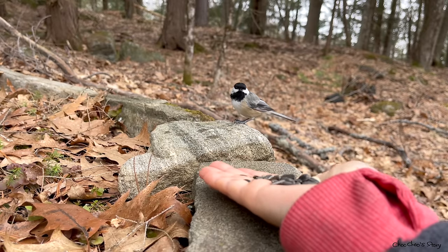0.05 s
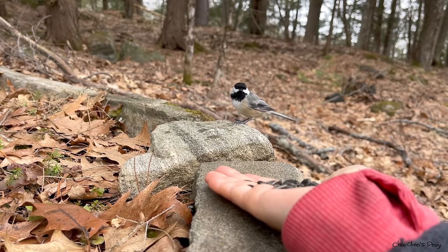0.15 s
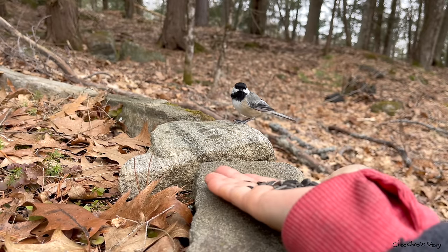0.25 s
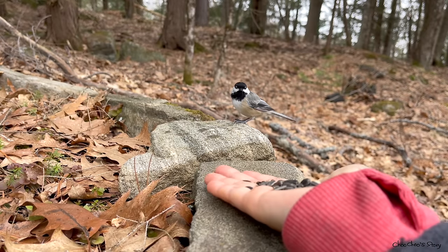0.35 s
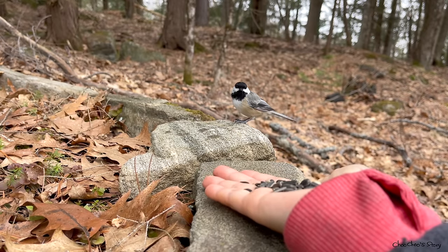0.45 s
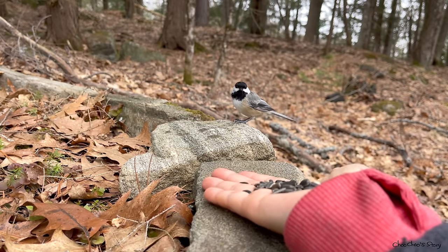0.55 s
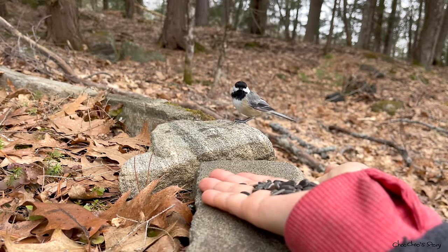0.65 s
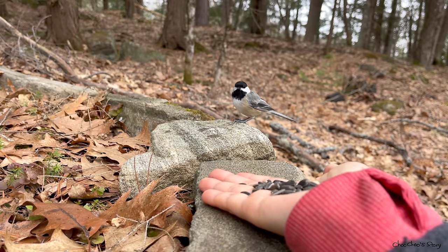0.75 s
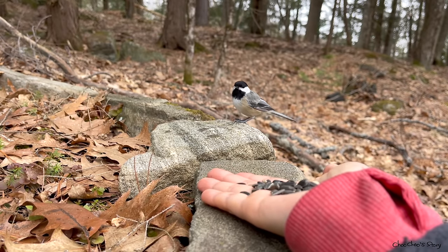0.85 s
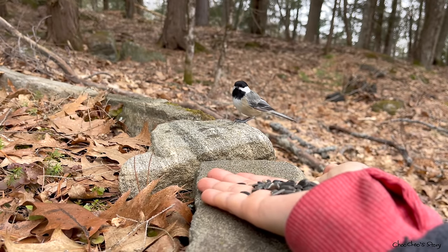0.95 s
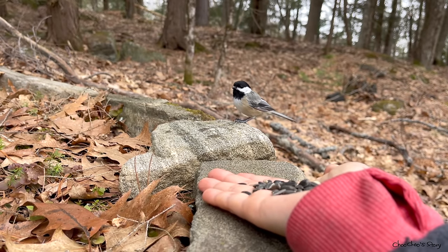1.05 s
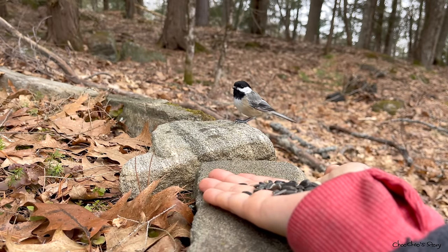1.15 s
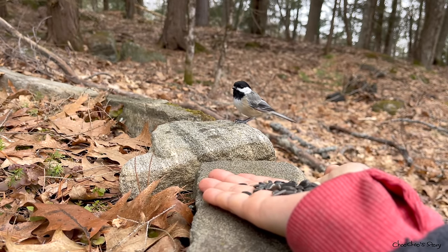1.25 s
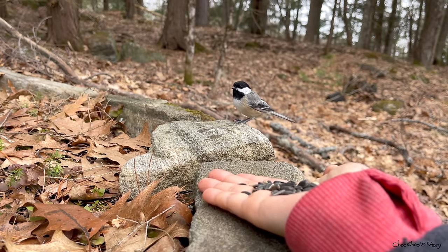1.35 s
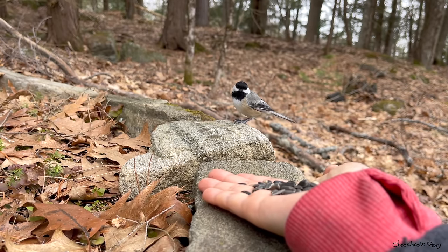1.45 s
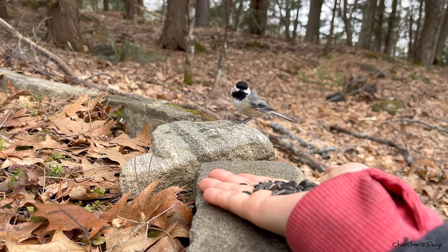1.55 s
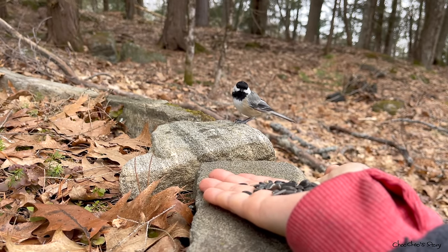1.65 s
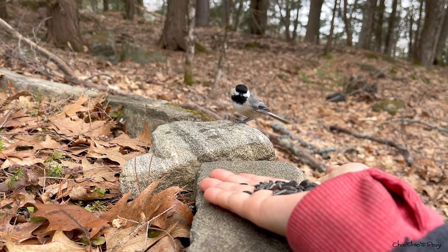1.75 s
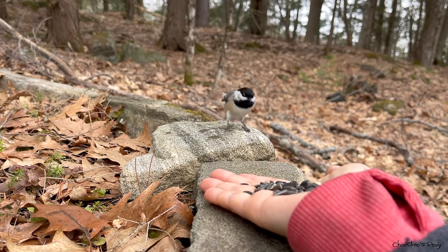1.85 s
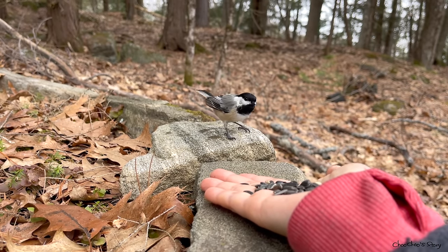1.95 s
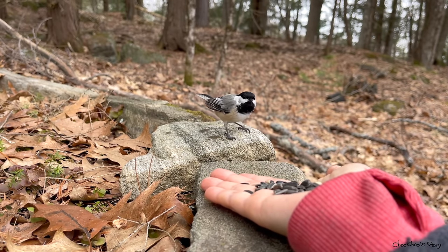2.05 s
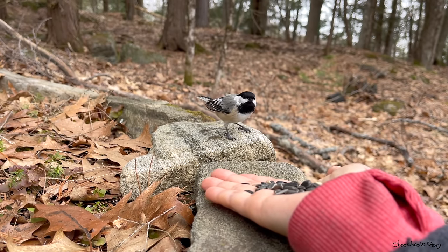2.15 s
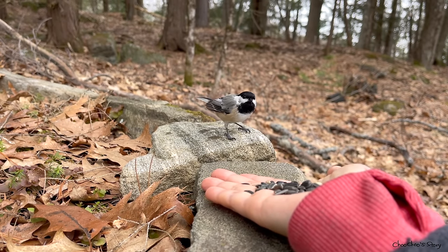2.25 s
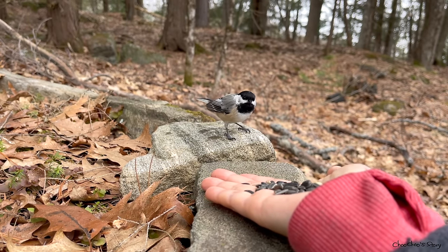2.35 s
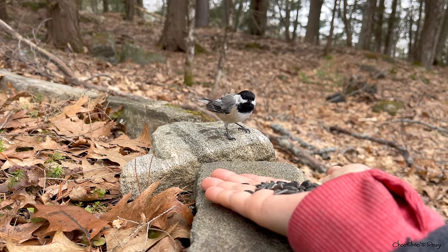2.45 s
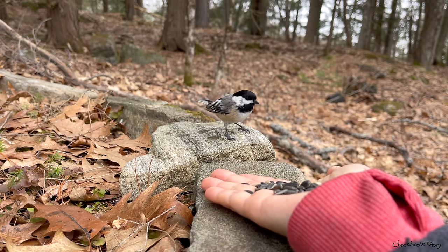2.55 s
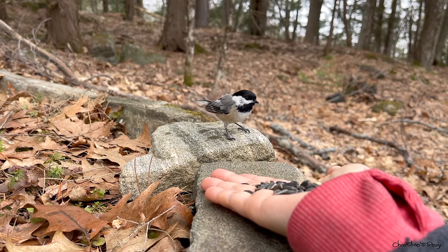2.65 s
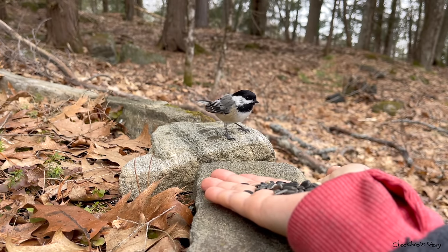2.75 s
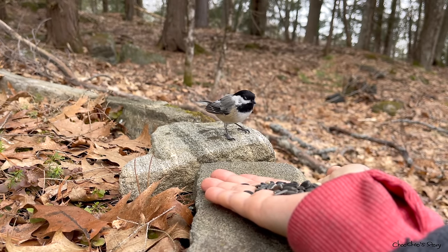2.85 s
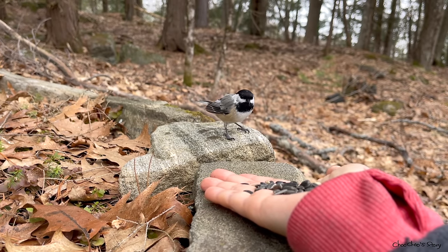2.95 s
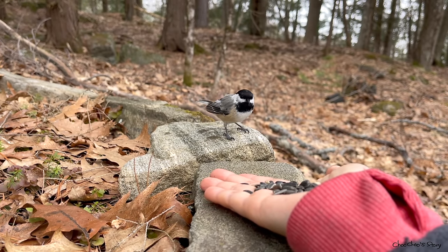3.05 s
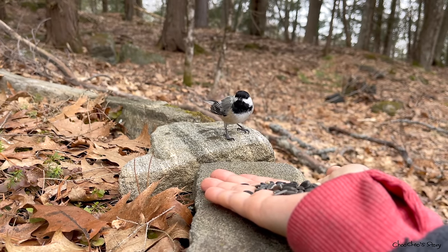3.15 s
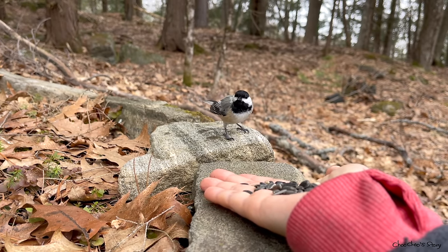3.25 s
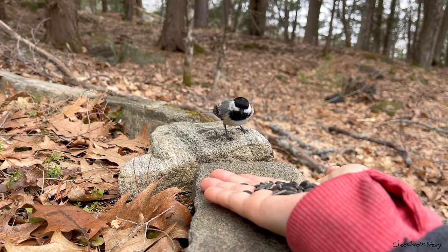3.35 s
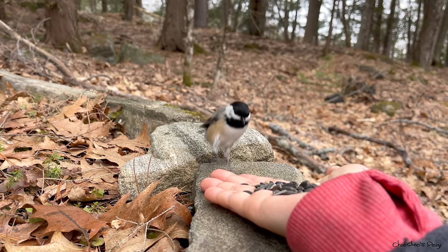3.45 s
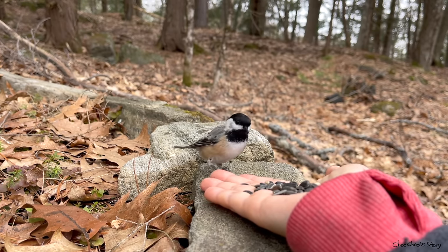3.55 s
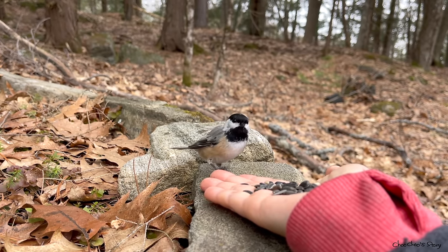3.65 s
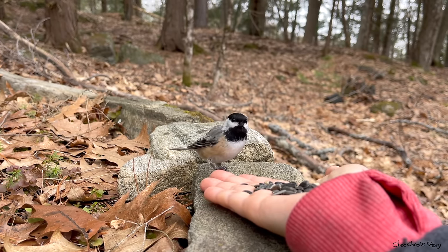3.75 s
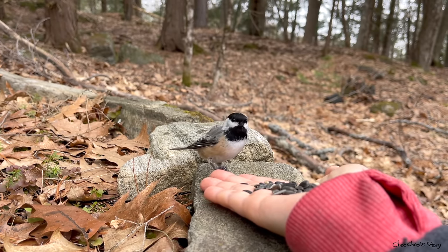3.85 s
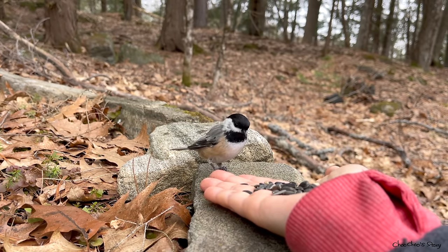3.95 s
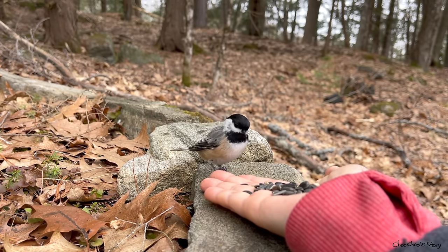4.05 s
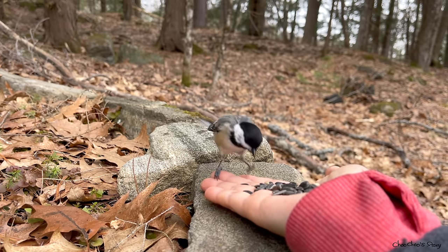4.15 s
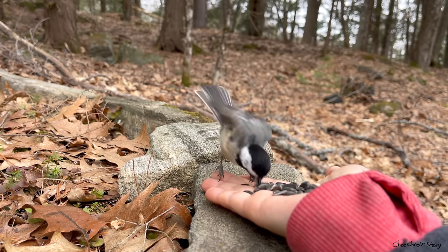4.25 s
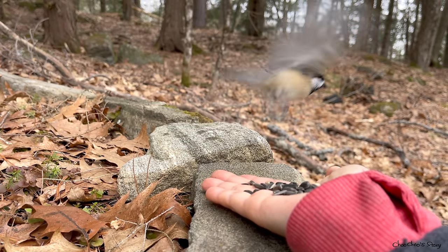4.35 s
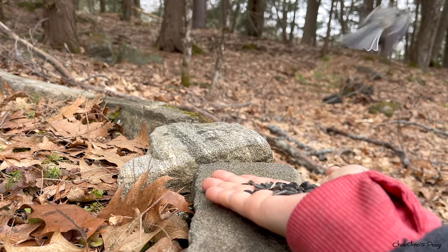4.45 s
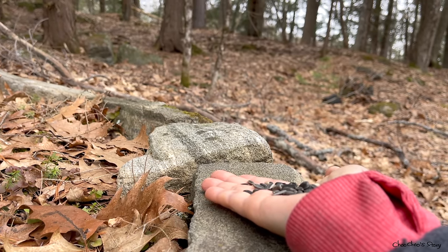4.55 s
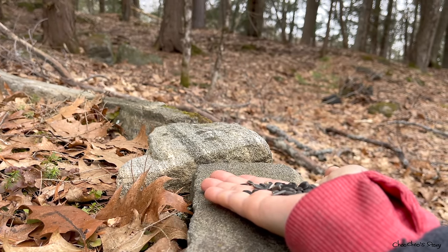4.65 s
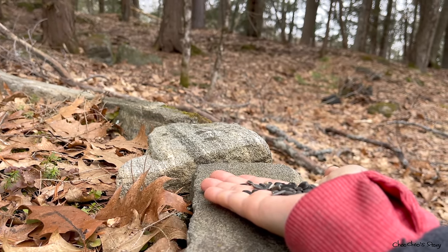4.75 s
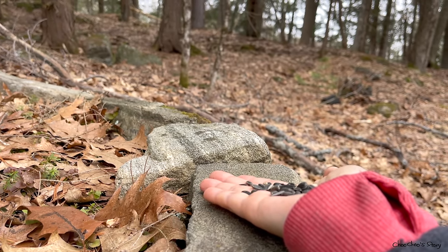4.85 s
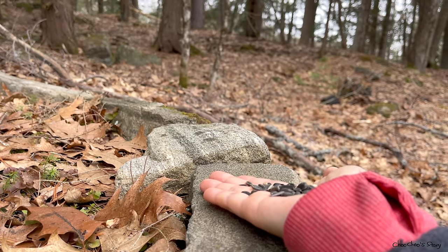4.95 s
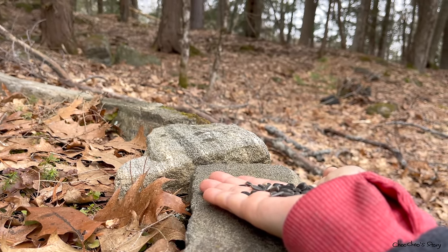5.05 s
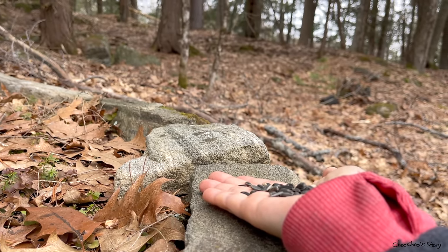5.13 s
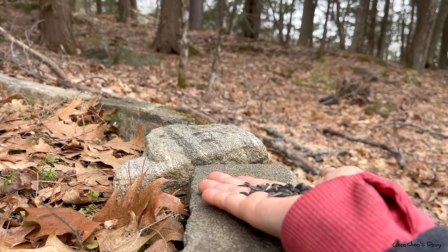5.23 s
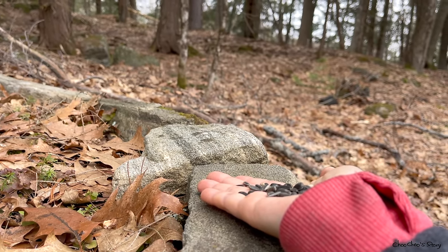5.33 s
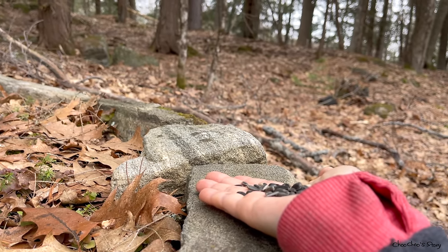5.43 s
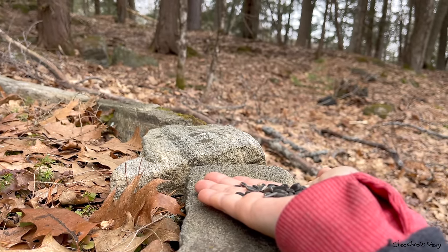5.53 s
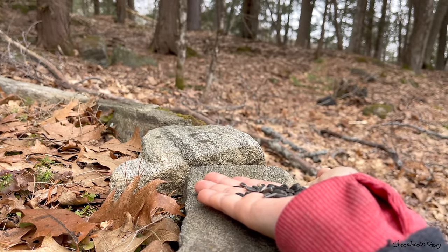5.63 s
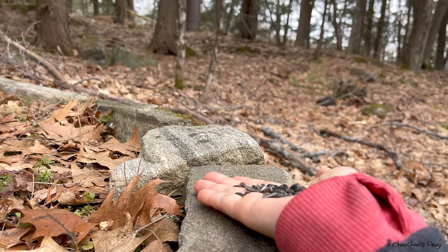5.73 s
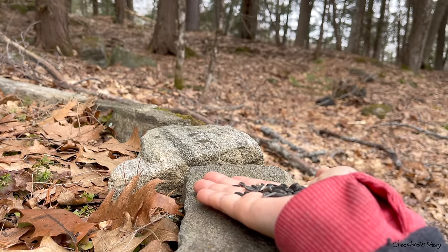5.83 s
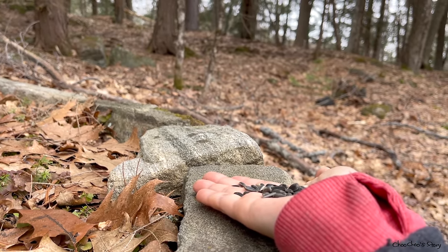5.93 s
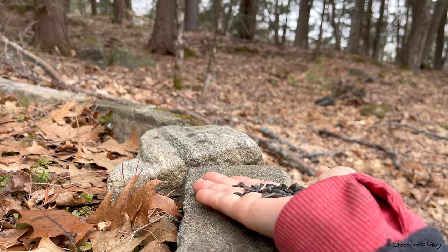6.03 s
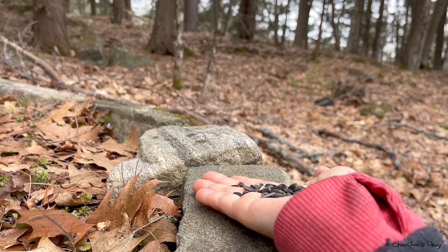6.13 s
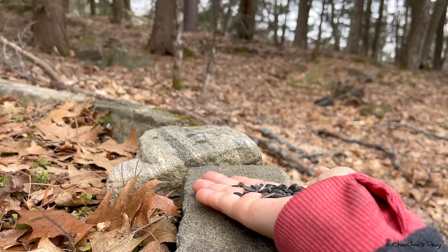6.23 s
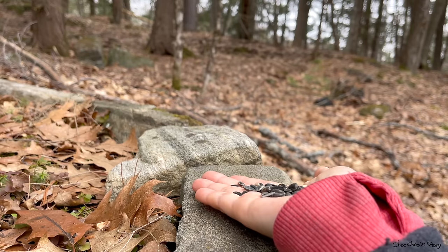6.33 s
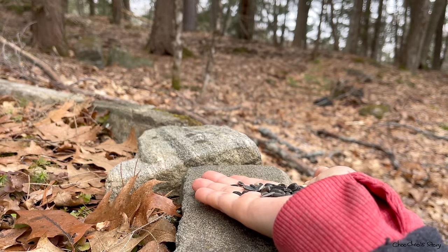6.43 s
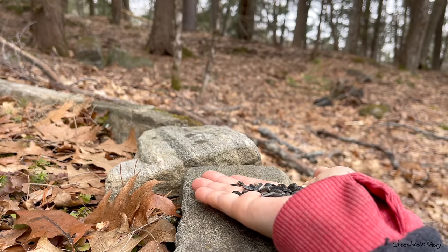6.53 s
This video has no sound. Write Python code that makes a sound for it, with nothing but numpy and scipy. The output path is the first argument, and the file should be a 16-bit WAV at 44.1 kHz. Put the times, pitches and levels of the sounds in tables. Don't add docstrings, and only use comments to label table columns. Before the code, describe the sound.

In a quiet wood, small birds chip sharply, seeds tick, wingbeats burst and fade, with hoarse far caws and a steady low rumble beneath.

```python
import sys
import numpy as np
from scipy import signal
from scipy.fft import rfft, irfft, next_fast_len
from scipy.io import wavfile
from scipy.ndimage import uniform_filter1d, map_coordinates

SR = 44100
rng = np.random.default_rng(int(sys.argv[2]) if len(sys.argv) > 2 else 0)


def gain_from_decibels(decibels):
    exponent = np.asarray(decibels, float) / 20
    return 10 ** exponent


def int16_out(signal):
    q = np.round(np.clip(np.atleast_2d(signal).T, -1, 1) * 32767)
    wavfile.write(sys.argv[1], SR, q.astype(np.int16))


N = 290574

# (time [s], level [dB])
TRAFFIC = [(0, -50.5), (.9, -50.5), (1.5, -48.5), (2.0, -49), (2.65, -45.5), (3.5, -49), (4.2, -48.5),
           (5.1, -48), (5.7, -47.5), (5.95, -49.5), (6.589, -47.5)]
# (frequency [Hz], level [dB])
RUMBLE_COLOUR = [(12, -62.5), (20, -37), (46, -8), (68, 1), (95, -5.5), (160, -12), (260, -30),
                 (400, -62.5), (600, -120)]
# (frequency [Hz], level [dB])
ROAD_COLOUR = [(80, -42.5), (200, 2.5), (350, -5), (800, -10.5), (1330, -24.5), (1900, -30), (3400, -33),
               (4500, -34.5), (7000, -34.5), (9500, -28.5), (11000, -32), (12200, -38.5), (13100, -50.5),
               (13500, -110)]
# (time [s], length [s], level [dB])
HUM_SPELLS = [(0.123, 0.68, -54), (1.182, .17, -51.5), (1.743, 0.42, -47), (2.201, 0.36, -52.5),
              (2.9, 0.54, -54), (3.62, 0.44, -52), (4.5, 0.609, -44), (5.096, .35, -44.5),
              (5.61, 0.71, -49.5)]
# (frequency
# [Hz], correlation [-1 to 1])
LIKENESS = [(60, .9995), (150, .98), (300, .75), (600, .12), (1300, .25), (1900, .7), (3300, .35),
            (5000, .5), (6000, .97), (7400, .68), (8400, .995), (9700, .995), (10900, .7), (12300, .98)]
# (frequency [Hz], phase [rad])
PORT_LEAD = [(300, 0), (900, -.7), (1900, .1), (2600, .7), (4000, .8), (4700, 2.5), (5300, 5.6),
             (5900, 6.28), (6200, 6.3), (8700, 9.38), (9600, 9.47), (12200, 12.5), (13200, 12.6),
             (15700, 15.7)]
# (frequency [Hz], difference [dB])
PORT_TILT = [(60, 0), (130, .4), (280, 1.4), (1000, .8), (2500, -.9), (4000, 0)]
# (frequency [Hz], level [dB])
BREATH_COLOUR = [(3500, -67.5), (4800, -19.5), (6000, -8), (7500, 3), (8500, -9), (10000, -69.5)]
# (share of the length [0-1], pitch over its top [ratio], level under its peak [dB])
HOOK = [(0, 0.78, -34), (.2, .905, -7.5), (.52, 0.94, -4.5), (.78, 0.98, -3.5), (.87, .93, -9),
        (1, 0.63, -32.5)]
SLUR = [(0, .84, -26), (.28, .905, -0.5), (.48, .91, -9.5), (.83, 1, -1), (1, .85, -15)]
RISE = [(0, .89, -22), (.06, .93, -8), (.24, .955, -5.5), (.38, .985, 0), (.8, 1, -7), (.92, .98, -11),
        (1, .95, -26)]
ARCH = [(0, .9, -18), (.09, .937, -8.5), (.27, .98, -3), (.52, 1, -.5), (.76, .992, -2), (.89, .965, -8),
        (1, .88, -32)]
FLAT = [(0, 0.905, -17), (.2, 0.96, 0), (.55, 1, -5.5), (1, 0.96, -6)]
SLIDE = [(0, 1, -8), (.2, 0.94, -8), (.7, .985, -5), (1, 1, -2)]
# (time [s], length [s], top pitch [Hz], peak level [dB], echo level [dB])
BIRDS = [
    (HOOK, -51, [(.002, 0.04, 7770, -30, -21.5), (1.353, 0.047, 7750, -33.5, -23.5), (2.51, .046, 7614, -34.5, -21.5)]),
    (SLUR, -35, [(2.875, 0.052, 7260, -43, -18.5)]),
    (RISE, -21.5, [(.3665, .055, 7780, -22, -28)]),
    (ARCH, -31, [(3.3235, .0505, 7535, -9, -39)]),
    (FLAT, -43, [(3.86, .05, 7330, -75, 0.5), (5.227, .036, 7400, -50, -4.5), (6.029, 0.0372, 7526, -49.5, -2.5)]),
    (SLIDE, -40, [(1.63, 0.16, 2160, -85.5, -7)]),
]
# (time [s], length [s], level [dB], change over the length [dB], dull share [dB])
RUSTLES = [(1.732, 0.053, -78, 0, -1), (1.825, .04, -77, 2, 3.5), (4.209, 0.24, -57.5, 6, -2),
           (4.325, 0.0051, -52, -2.5, 6), (4.404, 0.32, -44, -25, -6), (4.73, .1, -78, -4, 0),
           (4.856, .06, -73.5, 2, 2), (4.92, 0.18, -69.5, -21, 5.5), (5.485, .01, -66, 0, -8),
           (5.5, 0.012, -50, -8.5, -16), (5.517, 0.078, -73.5, -7.5, -1.5), (5.985, 0.04, -77.5, 14.5, -5),
           (6.042, .17, -60.5, -2.5, 0.5), (6.316, 0.048, -59, -7.5, -2), (6.351, 0.063, -56, -18, -2),
           (6.529, 0.06, -62.5, -13, -5)]
# (frequency [Hz], level [dB])
BRIGHT_COLOUR = [(1500, -99), (2500, -42), (4500, -18), (6500, -12), (8500, -2.5), (10000, 3.5),
                 (11000, -2.5), (11700, -9), (12300, -19), (13500, -36), (14500, -62), (16000, -90)]
# (frequency [Hz], level [dB])
DULL_COLOUR = [(80, -91), (150, 1), (400, 3.5), (1300, -4.5), (2200, -4.5), (2800, -9), (3300, -15.5),
               (4200, -9.5), (5000, -15), (7000, -34), (9000, -100)]
# (time [s], peak level [dB], low share [dB])
TICKS = [(1.7584, -50, -22), (1.858, -50, -30), (2.4453, -56.5, -17.5), (2.82, -51.5, -16),
         (2.8394, -54.5, -5), (3.0042, -43.5, -14.5), (3.0365, -56, -20), (3.4416, -46.5, -3.5),
         (3.9414, -57.5, -20.5), (4.0916, -57.5, -13.5), (4.1976, -44, -13), (4.2123, -40.5, -20),
         (4.2388, -35, -19), (4.4108, -28, -19.5), (4.4877, -39.5, 3), (4.5077, -45, 9), (4.5246, -40, 5),
         (4.5974, -42.5, 2.5), (4.7197, -52, -20), (4.9216, -54.5, 9), (4.9397, -48, 5), (5.215, -57, -6.5),
         (5.228, -56, -5.5), (5.4949, -50, -22.5), (6.0485, -43, -35), (6.087, -51.5, -18),
         (6.2178, -51, -27), (6.3155, -46, -8), (6.355, -42.5, -13), (6.537, -64, -23)]
# (time [s], length [s], pitch [Hz], level [dB], beak opening [dB])
CAWS = [
    (3.525, 0.25, 637.6, -57, -7.5),
    (3.982, 0.24, 659.3, -54.5, -14),
    (4.47, .26, 646, -57, 0.5),
    (4.915, 0.33, 676.5, -56, -12.5),
    (5.4, 0.43, 640, -75.5, -10),
]
# (frequency [Hz], width [Hz], level [dB])
THROAT = [(1250, 480, 0), (1750, 800, -5), (3400, 480, -5)]
# (time [s], air push [dB], swish [dB], feather whistle [dB])
BEATS = [(4.249, -35, -54, -72), (4.29, -24, -29, -46.5), (4.333, -27.5, -33, -51),
         (4.369, -21.5, -28.5, -43), (4.404, -23.5, -29.5, -38), (4.446, -23, -32, -41.5),
         (4.485, -26.5, -34, -42), (4.523, -31, -33.5, -43.5), (4.569, -31.5, -37.5, -46.5),
         (4.605, -32, -39.5, -46.5), (4.645, -33, -42, -48.5), (4.685, -39.5, -45.5, -55),
         (4.853, -62, -77, -68), (4.894, -56, -48, -60), (4.937, -45.5, -58, -59), (4.973, -45.5, -61, -63),
         (5.015, -48, -55, -71)]
# (frequency [Hz], level [dB])
SWISH_COLOUR = [(60, -6.5), (250, 3), (700, -8.5), (2000, -23.5), (5000, -26.5), (11000, -17), (13000, -34),
                (15800, -39.5), (16500, -74)]
# (time [s], level [dB], width [s])
BUMPS = [
    (5.56, -55, 0.013),
    (6.07, -41.5, .05),
    (6.17, -38.5, 0.046),
    (6.371, -37.5, .03),
]
# (frequency [Hz], level [dB])
BUMP_COLOUR = [(25, -21), (75, -1.5), (130, -15.5), (300, -27.5), (600, -32), (1500, -65.5)]


def unit(x):
    return x / np.sqrt(np.mean(x ** 2) + 1e-20)


def along(points, hz):
    f, v = np.transpose(points)
    return np.interp(np.log(hz + 1), np.log(f + 1), v)


def curves(rows, outside=None):
    s, *columns = np.transpose(rows)
    t = np.arange(N) / SR
    return [np.interp(t, s, column, outside, outside) for column in columns]


def wobble(rate):
    knots = rng.standard_normal(int(N * rate / SR) + 4)
    return map_coordinates(knots, [np.arange(N) * rate / SR])


def filtered(x, response):
    m = next_fast_len(N + SR // 2)
    return irfft(rfft(x, m) * response(np.fft.rfftfreq(m, 1 / SR)), m)[..., :N]


def noise(colour, channels=1):
    white = rng.standard_normal((channels, N))
    return unit(filtered(white, lambda hz: gain_from_decibels(along(colour, hz))))


def spread(pair):
    def mid_and_side(hz):
        turn = np.arccos(np.clip(along(LIKENESS, hz), -1, 1)) / 2
        return np.array([np.cos(turn), np.sin(turn)])

    mid, side = filtered(pair, mid_and_side)
    return np.array([mid + side, mid - side])


def echoes(x, t60, gap):
    t = np.arange(round(SR * t60)) / SR
    tail = rng.standard_normal(SR * 2)[:len(t)] * gain_from_decibels(-60 * t / t60) * (1 - np.exp(-t / gap))
    return signal.fftconvolve(x, tail / np.linalg.norm(tail))[:N]


def add(track, s, sound):
    part = track[round(s * SR):][:len(sound)]
    part += sound[:len(part)]


def traffic():
    rumble_db, = curves(TRAFFIC)
    road_db = -61.5 + 0.83 * (rumble_db - rumble_db.mean())
    idle_db, fade_s = -59.5, 0.1205
    spells = 0
    for s, length, db in HUM_SPELLS:
        present = curves([(s, 1.), (s + length, 1.)], outside=0)[0]
        spells = spells + (db - idle_db) * present
    hum_db = idle_db + uniform_filter1d(spells, size=round(fade_s * SR))
    rumble = gain_from_decibels(rumble_db + 3.5 + 1.1 * wobble(7.3)) * spread(noise(RUMBLE_COLOUR, channels=2))
    hum_phase = 2 * np.pi * np.cumsum(121 + 1.5 * wobble(7.7)) / SR
    hum = gain_from_decibels(hum_db + 2.5 + 2.8 * wobble(7)) * np.sin(hum_phase)
    wash = spread(noise(ROAD_COLOUR, channels=2))
    road = filtered(wash, lambda hz: 1 / (1 + (hz / 1100) ** 4))
    air = wash - road
    whine_phase = 2 * np.pi * np.cumsum(3400 + 45 * wobble(60)) / SR
    whine = gain_from_decibels(-89 + 3 * wobble(6)) * np.sin(whine_phase)
    return rumble + hum + whine + gain_from_decibels(road_db + 5 + wobble(9)) * road + gain_from_decibels(-57.0) * air


def chickadees():
    near, wet = np.zeros(N), np.zeros(N)
    chance = np.array([wobble(350), wobble(150), noise(BREATH_COLOUR)[0]])
    t = np.arange(SR // 5) / SR - .002
    nearest_db = -10
    for gesture, overtone_db, calls in BIRDS:
        share, pitch, level_db = np.transpose(gesture)
        for s, length, top_hz, peak_db, echo_db in calls:
            flutter, rasp, breath = chance[:, round(s * SR):][:, :len(t)]
            progress = t / length
            hz = uniform_filter1d(np.interp(progress, share, top_hz * pitch), size=70)
            db = uniform_filter1d(np.interp(progress, share, peak_db + level_db), size=70)
            phase = 2 * np.pi * np.cumsum(hz) / SR
            gate = 1. * (abs(progress - .5) < .5)
            gate = uniform_filter1d(uniform_filter1d(gate, size=50), size=50)
            waver_db = .25 - .04 * (peak_db - nearest_db)
            size = 2 * gain_from_decibels(db + waver_db * flutter) * gate
            octave = gain_from_decibels(overtone_db + 4.5 - 8 * progress + 2 * rasp) * np.sin(2 * phase)
            chip = size * (np.sin(phase) + octave + gain_from_decibels(-42.5) * breath)
            add(near, s + t[0], chip)
            add(wet, s + t[0], gain_from_decibels(echo_db) * chip)
    return near + echoes(wet, 0.31, .01) + gain_from_decibels(6.0) * echoes(wet, 0.094, 0.0023)


def rustle():
    swell = np.zeros((2, N))
    clumps = gain_from_decibels(3 * wobble(90) + 4 * wobble(700))
    bright, dull = noise(BRIGHT_COLOUR, channels=2), noise(DULL_COLOUR, channels=2)
    rise, fall = 4000, 800
    for s, length, start_db, change_db, low_db in RUSTLES:
        since = np.arange(N) / SR - s
        sag_db = change_db * np.clip(since / length, 0, 1)
        db = start_db + sag_db + rise * np.minimum(since, 0) - fall * np.maximum(since - length, 0)
        dull_db = db + low_db - 0.32 * sag_db
        swell += gain_from_decibels(np.array([db + 10.0, dull_db + 6.0]))
    rubbing = unit(clumps) * (swell[0] * bright + swell[1] * dull)

    high, low = np.zeros(N), np.zeros(N)
    t = np.arange(SR // 20) / SR
    for s, db, low_db in TICKS:
        fading = gain_from_decibels(-60 * t / .014) + .2 * gain_from_decibels(-60 * t / .07)
        snap = rng.standard_normal((2, len(t))) * fading
        add(high, s, gain_from_decibels(db + 7.0) * snap[0])
        add(low, s, gain_from_decibels(db + low_db) * snap[1])
    crisp = filtered(high, lambda hz: gain_from_decibels(along(BRIGHT_COLOUR, hz)))
    woody = filtered(low, lambda hz: 1 / (1 + (np.log((hz + 1) / 4500) / .6) ** 4))
    return spread(rubbing * [[1], [.6]]) + crisp + woody


def crow():
    t, voice = np.arange(N) / SR, np.zeros((2, N))
    jitter, rasp, breath = wobble(200), gain_from_decibels(2.5 * wobble(60)), rng.standard_normal(N)
    for s, length, hz, db, beak_db in CAWS:
        u = np.clip((t - s) / length, 0, 1)
        bend = 1 - .2 * np.exp(-u / .1) - .17 * u ** 2
        turns = np.cumsum(hz * (bend + 0.05 * jitter)) / SR
        pulses = np.diff(np.floor(turns), prepend=0) * (1 + 0.5 * (-1) ** np.floor(turns))
        swell = np.sin(np.pi * np.array([u ** .6, u ** .9]))
        voice += gain_from_decibels([[db], [db + beak_db]]) * swell * rasp * (unit(pulses) + .5 * breath)

    def peak(f, centre, width, db):
        return gain_from_decibels(db) * 1j * f * width / (centre * centre - f * f + 1j * f * width)

    def throat(f):
        deep = peak(f, *THROAT[0]) - peak(f, *THROAT[1])
        return np.array([deep, peak(f, *THROAT[2])]) ** 2

    low, high = gain_from_decibels(16.5) * filtered(voice, throat)
    middle, sides = echoes(low, 1.1, .04), echoes(low, 1.1, .04)
    return gain_from_decibels(0.5) * low + high + middle + .5 * sides * [[1], [-1]]


def wings():
    push, gate, close, tones = np.zeros((4, N))
    t = np.arange(SR // 20) / SR
    airborne_s = 4.39
    for s, push_db, swish_db, whistle_db in BEATS:
        hz = 1239 if s > airborne_s else 1095
        overtone_db = min(-16.5 + 51 * abs(s - airborne_s), -4.5)
        thrust = np.sin(np.pi * t / t[-1]) * np.sin(2 * np.pi * (72 * t - 180 * t * t) - 2.6)
        add(push, s - .016, gain_from_decibels(push_db) * thrust)
        since = t - .02
        slap = np.exp(-(since / 0.0061) ** 2) * np.sin(-2 * np.pi * 150 * since)
        add(push, s - .02, gain_from_decibels(push_db - 5) * slap)
        add(gate, s - .02, gain_from_decibels(swish_db - 1) * np.exp(-(since / 0.0083) ** 2))
        add(close, s - .02, gain_from_decibels(2.335 * swish_db + 42) * np.exp(-(since / 0.0052) ** 2))
        phase = 2 * np.pi * hz * (1.15 * t - 3 * t * t)
        swell = np.exp(-((t - .024) / 0.0075) ** 2)
        whistle = np.sin(phase) + gain_from_decibels(overtone_db) * np.sin(2 * phase)
        add(tones, s - .01, gain_from_decibels(whistle_db + 3.5) * swell * whistle)
    air = noise(SWISH_COLOUR, channels=2) * [[1], [.4]]
    body = filtered(air, lambda hz: 1 / (1 + (hz / 2500) ** 4))
    swish = spread(gate * body + close * (air - body))
    tones = tones * gain_from_decibels(1.2 * wobble(300))
    return push + tones + gain_from_decibels(-17.0) * echoes(tones, 0.19, .01) + swish


def bumps():
    t = np.arange(N) / SR
    swell = sum(gain_from_decibels(db) * np.exp(-((t - s) / width) ** 2) for s, db, width in BUMPS)
    return noise(BUMP_COLOUR)[0] * swell


def scene():
    return traffic() + chickadees() + rustle() + crow() + wings() + bumps()


def low_pass(x):
    return signal.sosfilt(signal.butter(12, 16360, fs=SR, output="sos"), x)


def record(dry):
    sides = np.array([[1], [-1]])

    def ports(hz):
        lead = np.exp(.5j * along(PORT_LEAD, hz) * sides)
        return lead * gain_from_decibels(along(PORT_TILT, hz) * sides / 2)

    return low_pass(filtered(dry, ports))


dry = scene()
out = record(dry)
int16_out(out)
```